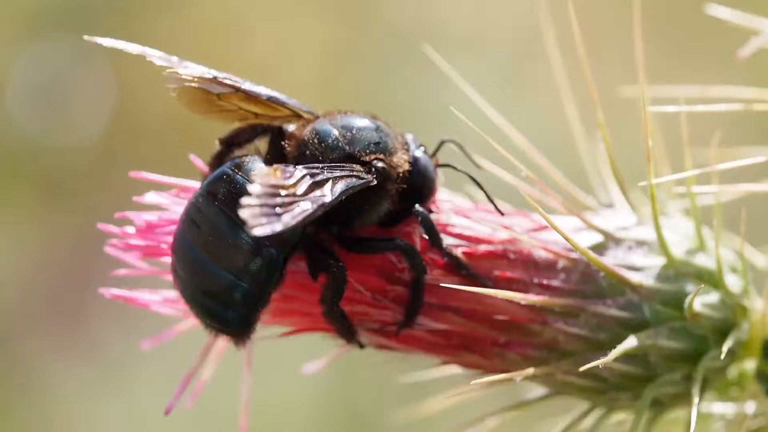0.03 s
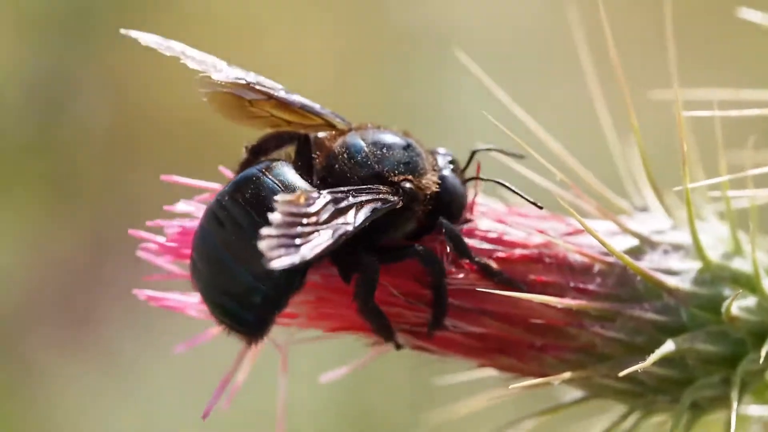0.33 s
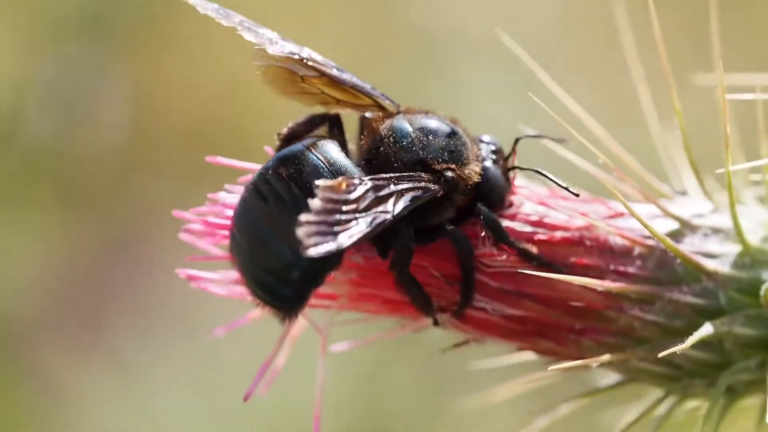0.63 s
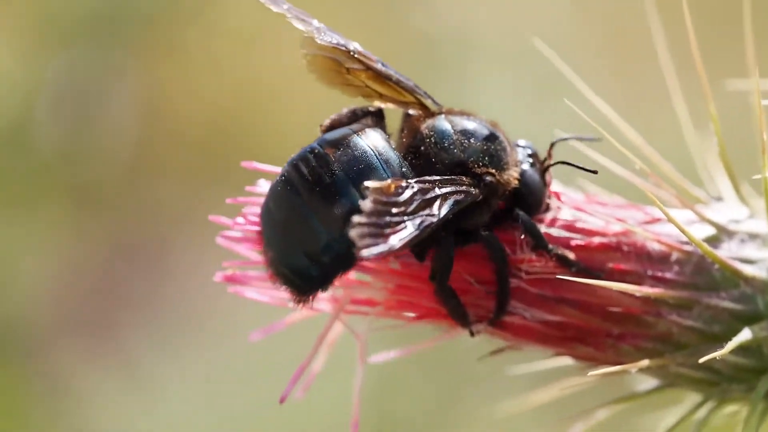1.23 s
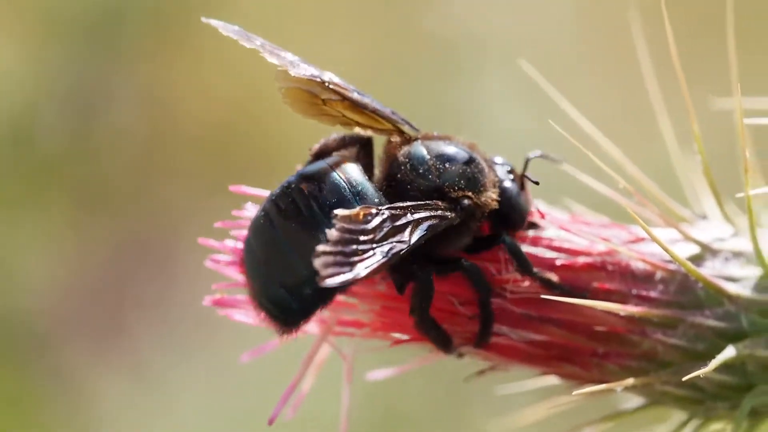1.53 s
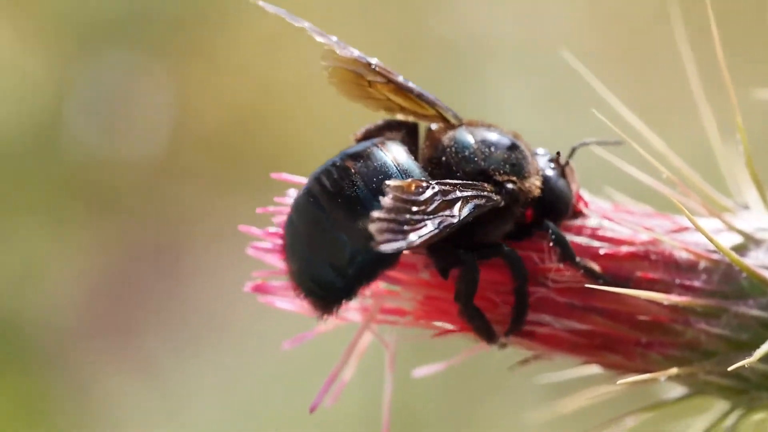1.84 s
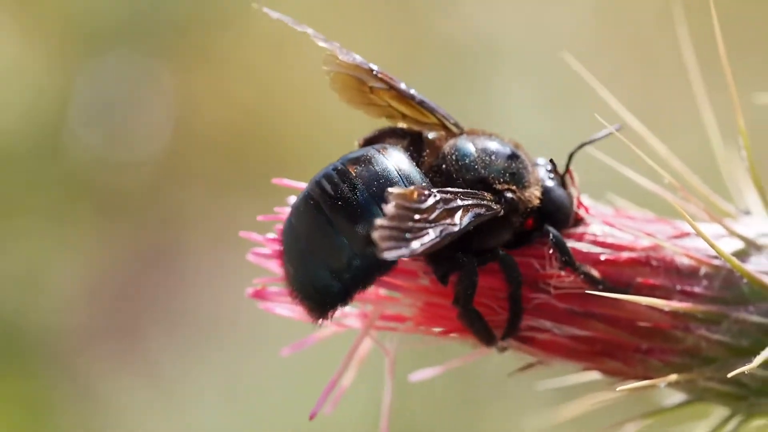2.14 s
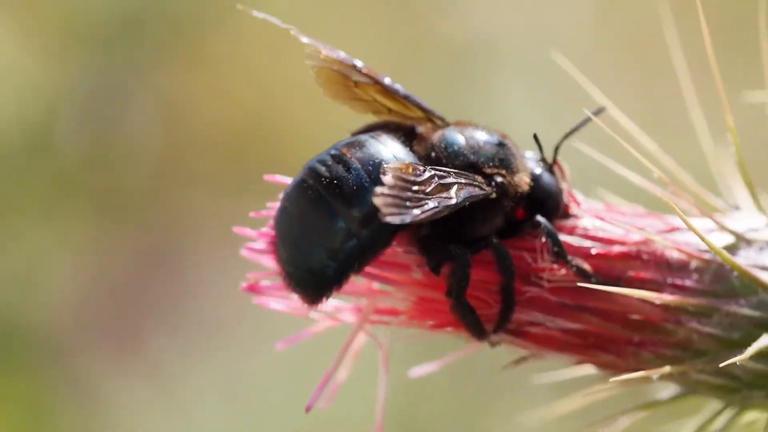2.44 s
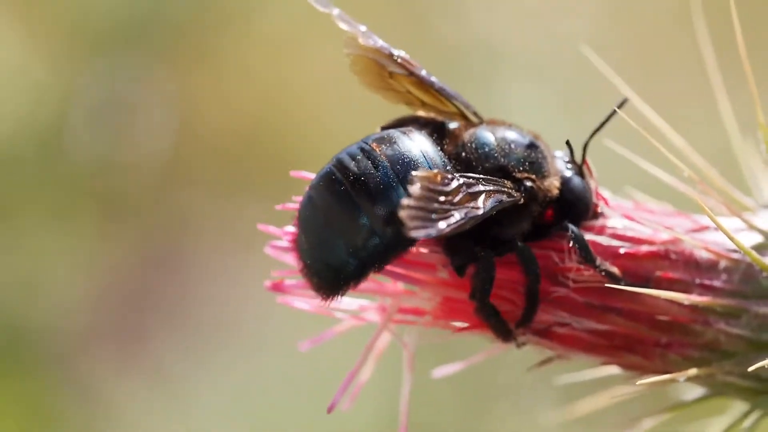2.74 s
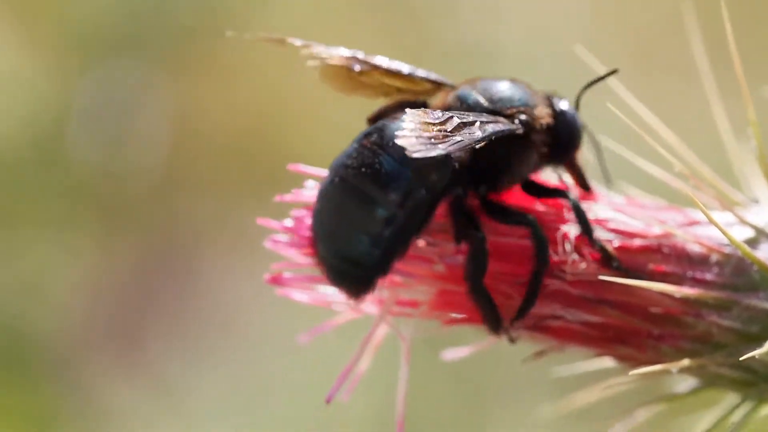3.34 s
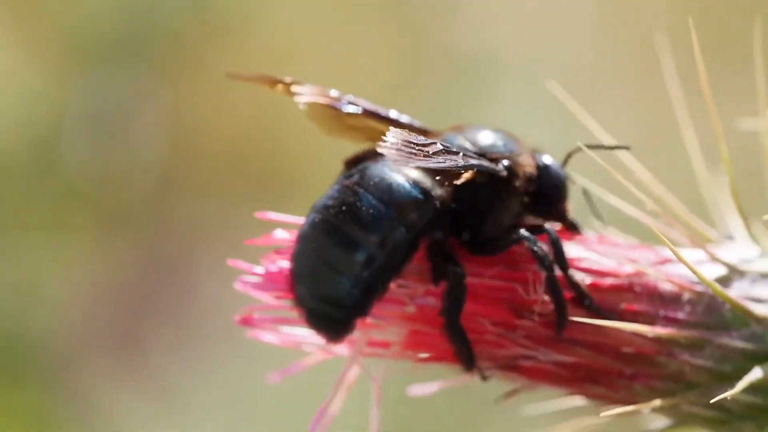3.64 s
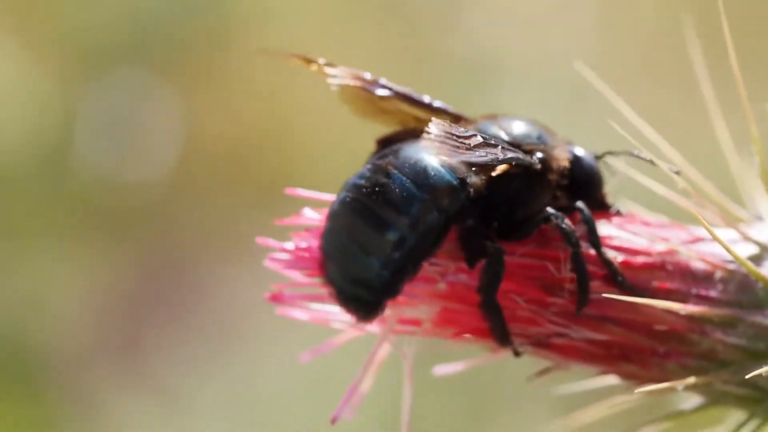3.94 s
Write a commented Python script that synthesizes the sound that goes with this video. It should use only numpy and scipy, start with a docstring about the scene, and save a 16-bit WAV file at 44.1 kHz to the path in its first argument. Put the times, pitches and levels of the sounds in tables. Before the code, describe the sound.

Light wind rushes steadily outdoors beside a flower, with a low hum of distant traffic underneath. Small birds chirp now and then some way off, the microphone catches two brief ticks, and the traffic swells near the end.

```python
"""A steady rush of light wind in the open air beside a flower, with a low engine-like hum underneath.
A breeze hisses through the plants; far traffic carries faint whines and swells near the end.
Small birds chirp some way off, their calls scattered by the vegetation. The microphone opens
with a soft pop, the camera gives two faint ticks, and there are two thin swishes and a soft low bump."""
import sys
import numpy as np
from scipy import signal
from scipy.fft import rfft, irfft, next_fast_len
from scipy.io import wavfile
from scipy.ndimage import uniform_filter1d, map_coordinates

SR = 44100
rng = np.random.default_rng(int(sys.argv[2]) if len(sys.argv) > 2 else 0)


def to_wav(s):
    """Save 16-bit WAV."""
    ch = np.atleast_2d(s).T  # columns
    pcm = np.round(np.clip(ch, -1, 1) * 32767)  # PCM
    wavfile.write(sys.argv[1], SR, pcm.astype(np.int16))


N = 176400


def amp(db):
    """Decibels to gain."""
    return 10 ** (np.asarray(db) / 20)


def unit(x):
    """Scale to rms 1."""
    return x / np.sqrt(np.mean(x ** 2) + 1e-20)


def clock():
    """Time of each sample in seconds."""
    return np.arange(N) / SR


def eq_curve(points, hz):
    """Gain in dB at hz, from (freq_hz, gain_db) points on a log axis."""
    freq_hz, gain_db = np.transpose(points)
    return np.interp(np.log(hz + 1), np.log(freq_hz + 1), gain_db)


def fader(points):
    """Gain per sample from (time_s, level_db) points."""
    return amp(np.interp(clock(), *np.transpose(points)))


def wobble(rate_hz):
    """A smooth random curve with rate_hz knots a second."""
    knots = rng.standard_normal(int(N * rate_hz / SR) + 4)
    return map_coordinates(knots, [clock() * rate_hz], mode="nearest")


def filtered(x, response):
    """Filter x by a gain given as a function of frequency."""
    size = next_fast_len(N + SR // 2)
    return irfft(rfft(x, size) * response(np.fft.rfftfreq(size, 1 / SR)), size)[..., :N]


def add(track, start_s, sound):
    """Mix a sound into the track at start_s."""
    part = track[round(start_s * SR):][:len(sound)]
    part += sound[:len(part)]


def stereo(mid, side):
    """Left and right from mid and side."""
    return np.array([mid + side, mid - side])


def rush(eq, patchy_db):
    """Coloured noise of rms 1 whose gain flickers in patches across time and frequency."""
    # narrow peaks and dips that colour every rush: centre_hz, width_hz, gain_db
    resonances = [(621, 130, 2), (933, 54, 1.5), (1302, 38, 4), (1486, 85, 1.5), (2150, 28, 3),
                  (2770, 143, 3), (3660, 340, 2), (4640, 510, -1.5), (4960, 420, 4), (5900, 240, 1),
                  (6360, 454, -2), (7343, 240, 2.5), (8050, 260, -8), (9140, 310, 1.5)]
    bins = signal.stft(rng.standard_normal(N), nperseg=512)[2]
    patches = uniform_filter1d(rng.standard_normal(bins.shape), size=6, axis=0)
    patches = uniform_filter1d(patches, size=14, axis=1)
    noise = signal.istft(bins * amp(patchy_db * unit(patches)))[1][:N]
    peaks_db = lambda f: sum(db * np.exp(-(2 * (f - hz) / width) ** 2) for hz, width, db in resonances)
    return unit(filtered(noise, lambda f: amp(eq_curve(eq, f) + peaks_db(f))))


def wide_rush(eq, side_db, patchy_db):
    """A rush spread between the ears."""
    return stereo(rush(eq, patchy_db), amp(side_db) * rush(eq, patchy_db))


def swell(peak_s, half_length_s, centre_hz, width_hz, level_db):
    """A band of noise rising and falling around peak_s."""
    band = unit(filtered(rng.standard_normal(N), lambda f: np.exp(-((f - centre_hz) / width_hz) ** 2)))
    return amp(level_db) * band * np.exp(-((clock() - peak_s) / half_length_s) ** 2)


def reflections(sound, depth_db=0.7, spacing_hz=45):
    """Nearby reflections leave a fine random ripple in the spectrum, weaker in the bass."""
    knots = rng.standard_normal(2048)
    ripple = lambda hz: np.interp(hz / spacing_hz, np.arange(len(knots)), knots)
    return filtered(sound, lambda hz: amp(depth_db * ripple(hz) * hz / (hz + 500)))


def vegetation_echoes(sound, early_decay_s=0.005, late_t60_s=0.18):
    """Plants scatter a sound into a tight stereo splash and a short tail."""
    t = np.arange(SR // 2) / SR
    early = unit(rng.standard_normal((2, len(t))) * np.exp(-t / early_decay_s))
    late = unit(rng.standard_normal((2, len(t))) * np.exp(-np.log(1000) * t / late_t60_s))
    impulse = (amp(-6) * early + amp(-10) * late) / np.sqrt(len(t))
    return signal.fftconvolve(sound[None], impulse, axes=1)[:, :N]


def hum(pitch_hz=87.6, drift=0.0039):
    """A low engine-like drone, wandering slightly in pitch, with two unsteady overtones."""
    # partials of the drone: pitch_ratio, level_db, roughness (0-1)
    partials = [(1, -56, 0.03), (2, -61.5, 0.65), (4.13, -76.5, 0.5)]
    phase = 2 * np.pi * np.cumsum(pitch_hz * (1 + drift * wobble(7.8))) / SR
    drone = np.zeros(N)
    for ratio, db, roughness in partials:
        flutter = (wobble(16) + 1j * wobble(16)) / np.sqrt(2)  # shakes both level and phase
        partial = np.exp(1j * ratio * phase) * (1 - roughness / 2 + roughness * flutter)
        drone += amp(db) * np.sqrt(2) * partial.real
    return drone


def whines():
    """Faint whines come and go in the traffic."""
    # narrow noise bands: peak_s, half_length_s, centre_hz, width_hz, level_db
    bands = [(.48, 0.14, 1380, 110, -52), (1.35, .14, 1366, 90, -48), (1.894, 0.14, 1460, 39, -50),
             (2.252, .2, 1440, 89, -57), (2.523, 0.21, 360.4, 6.1, -55.5), (2.874, 0.069, 1440, 77, -51.5),
             (3.153, 0.38, 643, 49, -57), (3.447, 0.097, 970, 130, -46), (3.75, .2, 2090, 35, -60)]
    return sum(swell(*band) for band in bands)


def traffic(tyre_peak_s=3.82, tyre_half_length_s=0.26, tyre_db=-46):
    """A far vehicle draws nearer, its tyres briefly brighter."""
    # rise and fall of the road noise: time_s, level_db
    road_levels = [(0, -58), (2.6, -69), (3.05, -51.5), (3.45, -47.5), (3.8, -44), (4, -45)]
    # tone of the road noise: freq_hz, gain_db
    road_eq = [(100, -22.5), (400, -11), (600, -1), (760, -8.5), (960, 4), (1200, -3), (1600, -10),
               (2500, -11), (4000, -62), (9000, -55)]
    # brighter tone of the tyres: freq_hz, gain_db
    tyre_eq = [(500, -20), (1500, -1.5), (2100, -3), (2600, -10), (3500, -10.5), (8000, -32)]
    road = fader(road_levels) * wide_rush(road_eq, side_db=-13, patchy_db=-1.5)
    tyre_gain = amp(tyre_db) / (1 + ((clock() - tyre_peak_s) / tyre_half_length_s) ** 2)
    return road + tyre_gain * wide_rush(tyre_eq, side_db=-3.5, patchy_db=4.7)


def swishes():
    """Two thin, high flicks of noise."""
    # high noise bands: peak_s, half_length_s, centre_hz, level_db
    bands = [(1.183, 0.016, 8200, -55), (1.212, .025, 10500, -63.5)]
    return sum(swell(peak_s, half_s, hz, 0.17 * hz, db) for peak_s, half_s, hz, db in bands)


def bump(centre_s=3.16, half_length_s=0.016, pitch_hz=159, level_db=-41.5):
    """A soft low bump: a few sine cycles with rounded edges."""
    t = clock() - centre_s
    return amp(level_db) * np.sin(2 * np.pi * pitch_hz * t) * np.exp(-(t / half_length_s) ** 2)


def camera_ticks(decay_cycles=3.25):
    """Dead little ticks of the camera, each gone within a few cycles."""
    # damped ticks: start_s, peak_db, pitch_hz
    ticks = [(.653, -24.5, 1144), (1.8132, -29.5, 720)]
    track = np.zeros(N)
    t = np.arange(SR // 20) / SR
    for start_s, db, hz in ticks:
        cycles = hz * t
        envelope = cycles * np.exp(-np.log(1000) * cycles / decay_cycles)
        tick = np.gradient(envelope * np.sin(2 * np.pi * cycles))
        add(track, start_s, -amp(db) * tick / np.abs(tick).max())
    return track


def bird_chirps(trill_hz=68, vibrato=0.07, tremolo=0.6, pitch_fall=0.31, swell_db=4):
    """Falling chirps, made burry by a fast trill in both pitch and level."""
    # burry calls: start_s, length_s, start_hz, level_db
    chirps = [(.748, 0.054, 4450, -41.5), (1.516, .062, 4338, -43.5), (1.794, .066, 4450, -43.5),
              (3.24, 0.061, 4370, -47)]
    track = np.zeros(N)
    for start_s, length_s, start_hz, db in chirps:
        progress = np.linspace(0, 1, int(length_s * SR))
        trill = 2 * np.pi * (trill_hz * progress * length_s + rng.random())
        glide = start_hz * (1 - pitch_fall * progress ** 1.4)
        pitch = glide * (1 + vibrato * np.sin(trill) + 0.021 * wobble(494)[:len(progress)])
        envelope = amp(db + swell_db * (progress - 1)) * np.abs(np.sin(np.pi * progress)) ** 0.106
        pulse = 1 + tremolo * np.cos(trill)
        add(track, start_s, envelope * pulse * np.sin(2 * np.pi * np.cumsum(pitch) / SR))
    return track


def bird_notes(jitter=0.015):
    """Short clear whistles, each bending through three pitches."""
    # whistled notes: start_s, length_s, start_hz, middle_hz, end_hz, level_db
    notes = [(1.868, .022, 5450, 5550, 5370, -50), (2.829, 0.028, 4100, 4520, 4760, -45.5),
             (2.859, 0.013, 4730, 4375, 3900, -45), (2.906, 0.0264, 3673, 4040, 4200, -44.5),
             (2.926, 0.018, 3280, 3192, 3070, -39), (2.948, 0.011, 3097, 3230, 3260, -42),
             (3.606, 0.023, 4350, 4580, 4800, -51), (3.678, .02, 3750, 4010, 4420, -43.5),
             (3.695, .01, 3250, 3240, 3170, -39), (3.717, .015, 3240, 3270, 3260, -40.5),
             (3.943, 0.038, 3880, 4010, 4264, -48.5)]
    track = np.zeros(N)
    for start_s, length_s, *bend_hz, db in notes:
        progress = np.linspace(0, 1, int(length_s * SR))
        glide = np.polyval(np.polyfit([0, 0.5, 1], bend_hz, 2), progress)
        pitch = glide * (1 + jitter * wobble(280)[:len(progress)])
        envelope = amp(db) * np.sqrt(np.abs(np.sin(np.pi * progress)))
        add(track, start_s, envelope * np.sin(2 * np.pi * np.cumsum(pitch) / SR))
    return track


def birds():
    """Small birds some way off, heard directly and scattered by the vegetation."""
    song = bird_chirps() + bird_notes()
    return song + vegetation_echoes(song)


def breeze(flutter_db=1.3):
    """Puffs of wind rush through the plants, with a finer hiss on top."""
    # puffs of wind: time_s, level_db
    body_levels = [(.3, -50), (.5, -50.5), (.66, -45.5), (.82, -48), (1.0, -51.5), (1.5, -55.5),
                   (1.95, -50), (2.3, -62), (2.5, -65), (2.8, -53), (4, -76)]
    # tone of the wind in the plants: freq_hz, gain_db
    body_eq = [(100, -30.5), (500, -12.5), (1200, -5), (2000, -3.5), (3000, -1.5), (4500, -8.5), (6000, -9),
               (9500, -22), (11500, -40.5), (15000, -40.5)]
    # swells of the fine hiss: time_s, level_db
    hiss_levels = [(.3, -67), (.55, -65), (.85, -58), (1.0, -73), (1.6, -68), (2.05, -60.5), (2.25, -66.5),
                   (2.47, -61.5), (2.75, -76), (4, -76)]
    # tone of the fine hiss: freq_hz, gain_db
    hiss_eq = [(2000, -31), (5000, -6), (7000, 2), (9000, 5.5), (11000, -11), (15000, -19)]
    body = fader(body_levels) * wide_rush(body_eq, side_db=-14, patchy_db=2.0)
    hiss = fader(hiss_levels) * wide_rush(hiss_eq, side_db=-6, patchy_db=1)
    return amp(flutter_db * wobble(14)) * (body + hiss)


def air(mid_db=-42.5, side_db=-51, rumble_db=-53, waver_db=0.18):
    """The steady rush of light wind outdoors, over a low mono rumble."""
    # tone of the air at the centre: freq_hz, gain_db
    mid_eq = [(180, -43), (300, -19.5), (360, -5.5), (391, -9), (438, -8), (508, -6.5), (619, -5),
              (1080, 0), (1200, -3.5), (1410, 0.5), (1560, -3.5), (1960, -10), (2280, -12.5), (2680, -10),
              (3330, -11.5), (5020, -17), (6430, -20.5), (7460, -21), (9090, -25), (10400, -30.5),
              (15400, -36.5)]
    # tone of the air at the sides: freq_hz, gain_db
    side_eq = [(15, -55), (25, -31), (55, -30), (82, -10), (140, -11.5), (420, -6), (1170, -4.5),
               (1370, -1), (2170, -5.5), (4020, -9.5), (5400, -13), (8530, -16), (15400, -27)]
    # tone of the rumble: freq_hz, gain_db
    rumble_eq = [(12, -33.5), (30, -26.5), (52, -13.5), (85, -6), (120, -0.5), (165, 1), (240, -1.5),
                 (300, -5), (420, -28.5), (1000, -60)]
    mid = amp(mid_db + waver_db * wobble(7.66)) * rush(mid_eq, patchy_db=0.94)
    rumble = amp(rumble_db) * rush(rumble_eq, patchy_db=-0.3)
    side = amp(side_db) * rush(side_eq, patchy_db=-0.1)
    return stereo(mid + rumble, side)


def scene():
    """A bed of wind and traffic with the smaller sounds on top, all leaning slightly right."""
    # stereo balance, added on the left and taken off the right: freq_hz, gain_db
    balance = [(100, -0.7), (1000, -0.44), (3000, -0.56), (8000, -0.27)]
    bed = reflections(air() + breeze() + traffic())
    mix = bed + whines() + hum() + birds() + camera_ticks() + swishes() + bump()
    return filtered(mix, lambda hz: amp(np.outer([1, -1], eq_curve(balance, hz))))


def record(dry):
    """The microphone opens with a dull pop, fades up and keeps nothing above its band limit."""
    open_s, fade_s, fade_from_db, top_hz = 0.27383, 0.14, -6.5, 15600
    push_db, push_s, pop_cutoff_hz = -20.5, 0.0015, 595
    t = np.maximum(clock() - open_s, 0)
    fade_in = (t > 0) * amp(fade_from_db * np.maximum(1 - t / fade_s, 0))
    push = -amp(push_db) * (t > 0) * (1 - t / push_s) * np.exp(-t / push_s)
    pop = filtered(push, lambda hz: 1 / (1 + 1j * hz / pop_cutoff_hz) ** 2)
    return filtered(dry * fade_in + pop, lambda hz: hz < top_hz)


dry = scene()
out = record(dry)
to_wav(out)
```